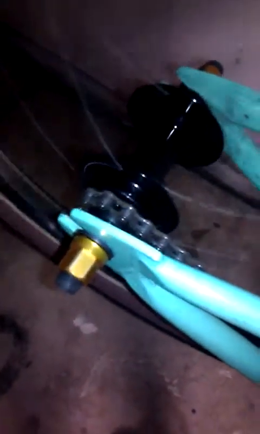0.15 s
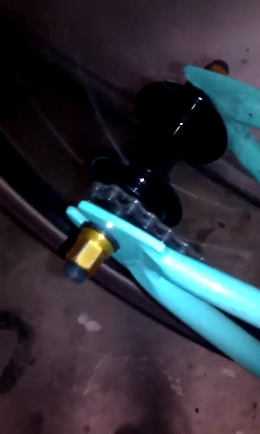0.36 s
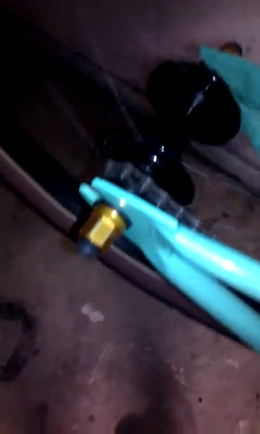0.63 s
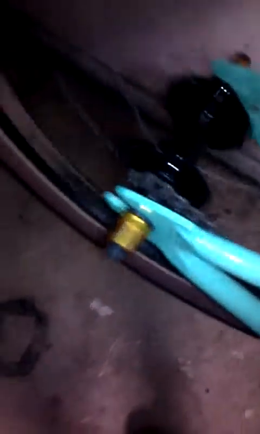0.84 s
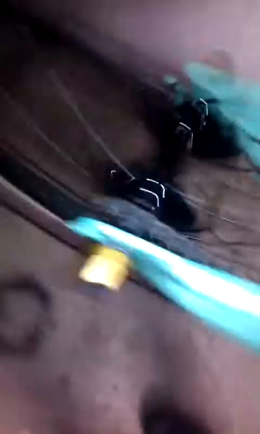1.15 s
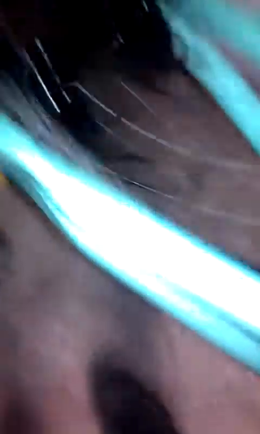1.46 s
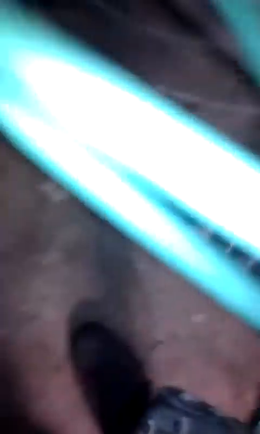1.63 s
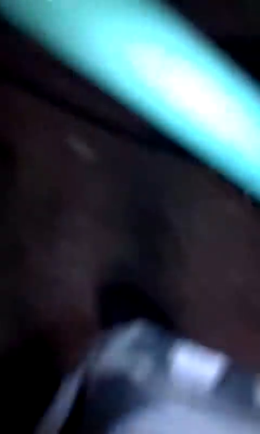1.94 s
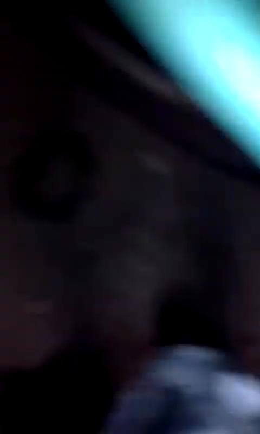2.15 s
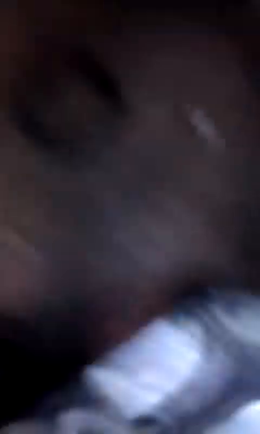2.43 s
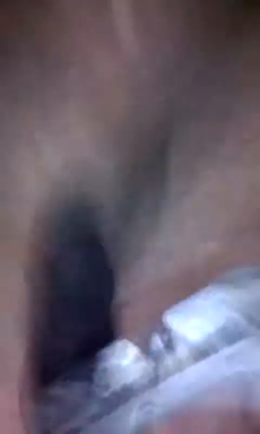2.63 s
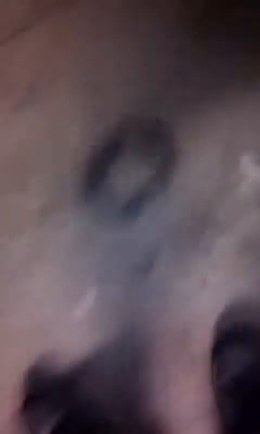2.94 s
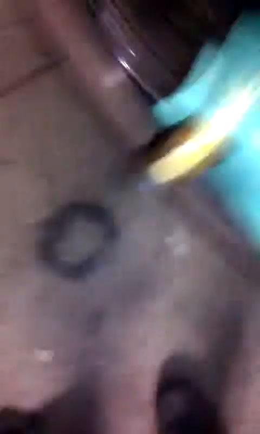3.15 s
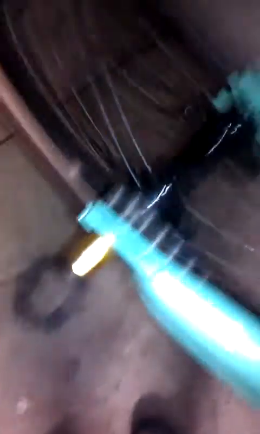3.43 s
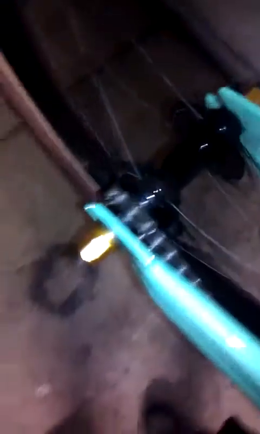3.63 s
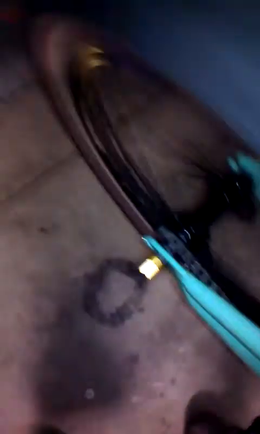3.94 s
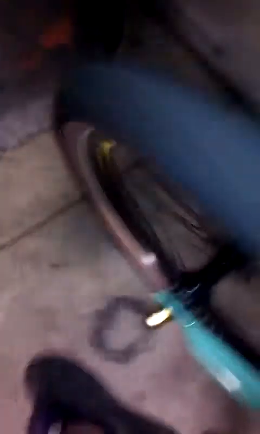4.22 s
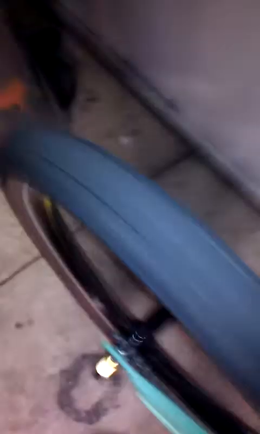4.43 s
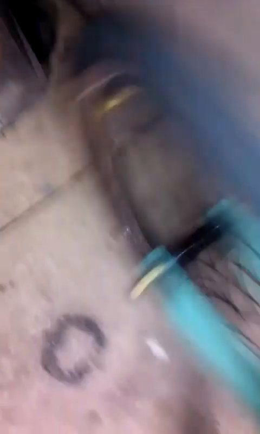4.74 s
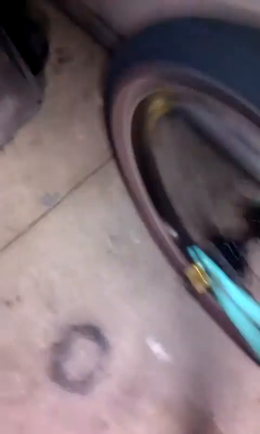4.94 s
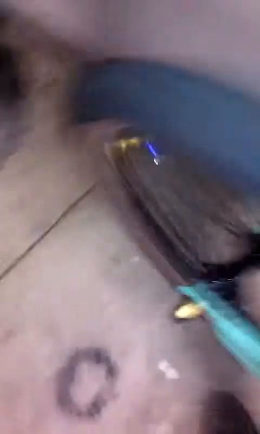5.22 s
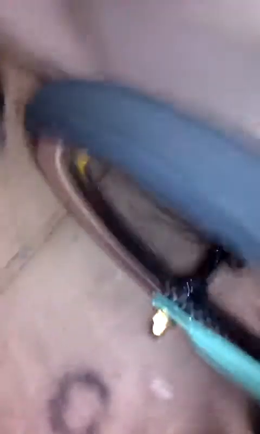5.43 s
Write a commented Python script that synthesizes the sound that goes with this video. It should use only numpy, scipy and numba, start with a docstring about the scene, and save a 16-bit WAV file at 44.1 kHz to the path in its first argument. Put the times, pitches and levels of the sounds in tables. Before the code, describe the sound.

A bicycle's rear hub freewheels close up, its metallic ratchet clicks blurring into a bright buzz that twice whirs faster, with a late thud.

```python
"""Freewheeling bicycle hub

A rear wheel spins freely close to a microphone in a concrete-floored room. Pawls snap over ratchet teeth
and ring damped modes of hub shell, spokes and frame; twice the cranks are pushed backwards and the clicks
speed up. Thuds, taps and scuffs ring frame modes; overload adds bursts of gated hiss and short one-sided
pops; low room noise is shaped noise with faint hums."""
import sys
import numpy as np
from scipy import signal
from scipy.fft import rfft, irfft, next_fast_len
from scipy.io import wavfile
from scipy.ndimage import uniform_filter1d
from numba import njit

SR = 44100
rng = np.random.default_rng(int(sys.argv[2]) if len(sys.argv) > 2 else 0)


def output_pcm(signal):
    """Save a mono or channel-first signal as 16-bit PCM at the path in sys.argv[1].

    Samples are clipped to [-1, 1] before scaling.
    """
    pcm = np.clip(np.atleast_2d(signal).T, -1, 1) * 32767
    wavfile.write(sys.argv[1], SR, np.round(pcm).astype(np.int16))


N = 246078

# pawls on each tooth: lag_teeth, scatter_teeth, near_strength_db, afar_strength_db
PAWLS = [(0.0, .008, -1.5, -7), (.12, 0.03, -9.5, -7.5), (.3, 0.04, -16, -10.5), (.5, 0.13, -16.5, -15)]
# span in which the microphone draws back: start_s, end_s
DRAWING_BACK_S = (3.65, 4.1)
# level swing of each frequency range with the wheel's turning, lowest range first: swing_db, lead_turns
TURN_SWING = [(0.57, 0.068), (1.2, 0.041), (3, -0.52), (1, -0.19), (.8, -0.49)]


def from_db(db):
    """Logarithmic level: decibels to amplitude gain."""
    return 10 ** (np.asarray(db) / 20)


def rms_one(x):
    """Normalisation of the mean power: scale to unit rms."""
    return x / np.sqrt(np.mean(x ** 2) + 1e-20)


def in_time(rows):
    """Linear interpolation in time: each column of a curve, one value a sample."""
    s, *columns = np.transpose(rows)
    return [np.interp(np.arange(N) / SR, s, column) for column in columns]


def at_hz(points, hz):
    """Spectral envelope, interpolated on a log-frequency axis."""
    point_hz, value = np.array(points)[:, 0], np.array(points)[:, 1]
    return np.interp(np.log(hz), np.log(point_hz), value)


def ring(clicks, hz, t60):
    """Damped oscillator: a unit click sets a sine of height 1 ringing, 60 dB down after t60 seconds."""
    r, w = from_db(-60 / (t60 * SR)), 2 * np.pi * hz / SR
    return signal.lfilter([0, np.sin(w)], [1, -2 * r * np.cos(w), r * r], clicks + 1e-18)


@njit
def ring_stepped(clicks, at, pull, r):
    """Damped oscillator with switched stiffness: its pitch takes a new value at each snap."""
    out, last, before = np.zeros(len(clicks)), 0.0, 0.0
    for k in range(len(at) - 1):
        for i in range(at[k], at[k + 1]):
            last, before = clicks[i] + pull[k] * last - r * r * before, last
            out[i] = last
    return out


def even(x):
    """Running power normalisation over 1/8 s, so that click speed does not set the loudness."""
    power = uniform_filter1d(x ** 2, size=SR // 8, mode="reflect")
    return x / np.sqrt(power + 1e-12)


def room(x, drift_per_s):
    """Diffuse reverberation of unit energy; the moving microphone glides between two echo patterns."""
    t60_s, onset_s = 0.7, 0.0016
    t = np.arange(SR // 2) / SR
    tails = rng.standard_normal((2, len(t))) * from_db(-60 * t / t60_s) * np.minimum(t / onset_s, 1)
    tails = tails / np.sqrt(np.sum(tails ** 2, axis=1, keepdims=True))
    size = next_fast_len(N + SR)
    here, there = irfft(rfft(x, size) * rfft(tails, size), size)[:, :N]
    angle = 2 * np.pi * drift_per_s * np.arange(N) / SR
    return here * np.cos(angle) + there * np.sin(angle)


def teeth_passed():
    """Ratchet kinematics: tooth rate integrated to the count of teeth gone by the pawls."""
    # ratchet speed: time_s, teeth_per_s
    spin = [(0.0, 69.39), (1.0, 67.42), (1.8, 64.63), (2.083, 66.05), (2.277, 86.41), (2.489, 121.8),
            (2.699, 87.71), (2.959, 57.6), (3.15, 55.7), (3.3, 57.73), (3.6, 56.1), (3.9, 57.04),
            (4.08, 59.84), (4.216, 56.82), (4.465, 76.97), (4.673, 158.52), (4.749, 127.3), (4.808, 50.0),
            (5.0, 57.02), (5.3, 54.9), (5.58, 55.51)]
    teeth_before_first_snap = .695
    return np.cumsum(in_time(spin)[0]) / SR - teeth_before_first_snap


def afar_at(s):
    """Source distance as a fraction: 0 while the microphone is near, 1 once it has drawn back."""
    return np.interp(s, DRAWING_BACK_S, [0, 1])


def turn_db(swing_db, lead_turns):
    """Rotational modulation: level swings once a wheel turn, fading as the microphone draws back."""
    start_turns_per_s, slowing_per_s = 3.04, .24  # turns per s, and its loss each second
    t = np.arange(N) / SR
    turns = start_turns_per_s * t - slowing_per_s * t ** 2 / 2
    return (1 - afar_at(t)) * swing_db * np.cos(2 * np.pi * (turns + lead_turns))


def snaps(uneven_db):
    """Impact excitation: sample and strength of each snap; pawls of one tooth land a little apart."""
    teeth = teeth_passed()
    tooth = np.arange(int(teeth[-1]))[:, None]
    lag, scatter, near_db, afar_db = np.transpose(PAWLS)
    chance = rng.standard_normal((len(tooth), 2, len(PAWLS)))
    at = np.interp(tooth + lag + scatter * chance[:, 0], teeth, np.arange(N))
    afar = afar_at(at / SR)
    strength = from_db(near_db + afar * (afar_db - near_db) + uneven_db * chance[:, 1])
    return at.astype(int).ravel(), strength.ravel()


def shell_modes(count):
    """Modal density: closely packed modes follow a spectrum, and shorter rings get taller."""
    # spectrum of hub and spoke modes: pitch_hz, density_db_per_hz
    shell = [(560, -77.5), (950, -22.5), (1170, -24.5), (1930, -18.5), (2480, -10.5), (2670, -18.5),
             (2920, 8), (3300, -5.5), (4310, 0), (4680, -15), (5630, -24), (6060, -16), (7700, 2),
             (8060, -8.5), (8600, -10), (11200, -45.5), (18900, -120)]
    # decay of these modes: pitch_hz, t60_s
    shell_t60 = [(800, 0.04), (3000, 0.043), (5500, 0.042), (8500, 0.043)]
    hz = np.linspace(900, 8800, count) + rng.uniform(-26.5, 7.6, count)
    t60 = at_hz(shell_t60, hz)
    return np.transpose([hz, at_hz(shell, hz) - 10 * np.log10(t60 / 0.017), t60])


def struck(at, strength, modes, fickle_db, detune, swell=False):
    """Modal synthesis in five ranges: each snap shares its energy anew and shifts the pitches a little."""
    # edges between the five ranges: edge_hz
    range_edges_hz = (2800, 3800, 4500, 5600)
    # span in which the microphone turns to the rim: start_s, end_s
    turning_s = (2.7, 3.45)
    # towards the rim other modes face the microphone: pitch_hz, change_db
    rim_colour = [(1000, 0), (1550, -2.5), (2000, -1), (2550, 1.5), (3000, 4.5), (3600, 7), (4300, -16.5),
                  (5200, -18), (6150, -2), (7000, -4), (7800, -1), (8600, 4.5)]
    out = np.zeros((len(TURN_SWING), N))
    steps = np.append(np.sort(at), N)
    chance = rng.standard_normal((len(at), 3, len(modes)))
    height = from_db(np.array(modes)[:, 1])
    share = height * from_db(fickle_db * chance[:, 1])
    # the shares of every snap hold the same total energy
    share = share * np.sqrt(np.sum(height ** 2) / np.sum(share ** 2, axis=1, keepdims=True))
    turned = np.interp(at / SR, turning_s, [0, 1])
    for k, (hz, _, t60) in enumerate(modes):
        r, w = float(from_db(-60 / (t60 * SR))), 2 * np.pi * hz / SR
        pull = 2 * r * np.cos(w * (1 + detune * chance[:, 2, k]))
        sign = np.sign(chance[:, 0, k])
        colour = from_db(turned * at_hz(rim_colour, hz))
        clicks = np.full(N, 1e-18)
        clicks[at] = np.sin(w) * strength * sign * share[:, k] * colour
        tone = ring_stepped(clicks, steps, pull, r)
        if swell:  # the blow reaches the radiating part through a like resonance: the ring swells first
            tone = ring_stepped(tone, steps, pull, r) * np.sin(w) * 20 / (t60 * SR)
        out[np.searchsorted(range_edges_hz, hz)] += tone
    return out


def freehub():
    """Impact-driven modal radiation: snaps ring shell and frame, heard direct and by the room."""
    # hub level before the turn swing: time_s, level_db at 2.8-3.8 kHz, then against it:
    # low_db (below 2.8 kHz), upper_db (3.8-4.5 kHz), valley_db (4.5-5.6 kHz), treble_db (above)
    hub_level = [(0.0, -26.5, -11, -2, -8, 0), (0.25, -25, -11, -6.5, -9.5, -0.5),
                 (0.5, -26, -11.5, -6, -10, -0.5), (0.9, -26.5, -10.5, -6, -8.5, 0),
                 (1.3, -25, -10.5, -7, -9, 1), (1.8, -23.5, -12.5, -7, -7, -0.5),
                 (2.15, -22.5, -12, -6.5, -9.5, -1), (2.4, -23.5, -10, -5, -6.5, 1),
                 (2.62, -22, -12.5, 2, -13, -5.5), (2.75, -22, -11, -11, -7.5, -3.5),
                 (3.0, -25, -10, -5, -9, -4), (3.25, -23, -13.5, -16, -14.5, -9),
                 (3.4, -31, -3.5, -5.5, -7, 1.5), (3.55, -25.5, -10, -15, -14, -4.5),
                 (3.7, -27, -5, -9, -10.5, -6.5), (3.9, -33.5, -4.5, -6.5, -6, -1),
                 (4.05, -30, -6, -10, -10.5, -3), (4.3, -32.5, -4, -4.5, -7.5, -2.5),
                 (4.55, -27, -8, -6, -10, -2), (4.7, -21, -8, -8, -12, -5),
                 (4.77, -27, -6, -3, -10.5, -4.5), (4.85, -31, -4, -10, -9.5, -2),
                 (5.2, -31.5, -6.5, -5.5, -8.5, -3.5), (5.58, -32.5, -6.5, -10, -6.5, -2)]
    # room against direct sound, before each range's own offset: time_s, room_db
    room_share = [(0, -7), (1.5, -9.5), (1.8, -8.5), (2.1, -8.5), (2.5, -6.5), (3.1, -11.5), (4.2, -8),
                  (5.58, -9.5)]
    # sparse frame modes, relative: pitch_hz, level_db, t60_s
    frame = [(959, -36, 0.042), (1566, -38, 0.07), (1800, -33, 0.036), (2497, -22.5, 0.032),
             (3016, -24, 0.038), (3270, -16, .025), (3980, -12.5, .03), (6200, -14, 0.028),
             (6540, -15, 0.046), (7370, -29, 0.02)]
    # swelling rings at each snap, short and long, relative: pitch_hz, level_db, t60_s of each resonance
    crack = [(1620, -30, 0.0033), (3031, -7, 0.055), (3330, -10, 0.0045), (3750, -1, 0.016),
             (4226, -10, 0.033), (5150, -18.5, 0.005), (6030, -20, 0.035), (6940, -1, 0.0065),
             (7756, -3.5, 0.0078), (8000, -9.5, 0.0081)]
    # the first pawl's own sharp tick, same columns: pitch_hz, level_db, t60_s
    tick = [(3020, -9, .009), (3330, -2, .012), (3720, -5, .007), (4200, -8, .006), (6150, -12, .007),
            (7600, -6, .004)]
    level_db, low_db, upper_db, valley_db, treble_db = in_time(hub_level)
    room_db = in_time(room_share)[0]
    at, strength = snaps(uneven_db=1.0)
    parts = struck(at, strength, shell_modes(count=105), fickle_db=7.5, detune=0.01)
    parts = parts + from_db(12.5) * struck(at, strength, frame, fickle_db=2.0, detune=0.0048)
    parts = parts + from_db(14.5) * struck(at, strength, crack, fickle_db=6.0, detune=0.026, swell=True)
    first = slice(None, None, len(PAWLS))
    ticks = struck(at[first], strength[first], tick, fickle_db=2.5, detune=.022, swell=True)
    parts = parts + from_db(23) * ticks
    range_db = (low_db, 0, upper_db, valley_db, treble_db)
    more_room_db = (9.5, 2.5, 8.5, 9, 4.3)
    lowest_hz = (960, 2600, 3260, 4040, 5300)
    out = 0
    for part, db, wetter_db, bottom_hz, turn in zip(parts, range_db, more_room_db, lowest_hz, TURN_SWING):
        # small parts radiate little below their own modes
        highpass = signal.butter(3, bottom_hz, "high", fs=SR, output="sos")
        direct = even(signal.sosfilt(highpass, part))
        wet = from_db(room_db + wetter_db) * room(direct, drift_per_s=1.3)
        out = out + from_db(level_db + db + turn_db(*turn)) * even(direct + wet)
    return out, at


def rumble():
    """Spectral shaping of noise: low room noise with faint resonant hums, uneven in level."""
    # noise spectrum, relative: pitch_hz, density_db_per_hz
    spectrum = [(100, 5), (130, -7), (190, -15.5), (240, 5.5), (285, -6), (340, -24), (395, -6.5),
                (470, 6.5), (555, -10.5), (640, -0.5), (720, -10.5), (800, -29), (870, -12), (950, 1.5),
                (1200, -6.5)]
    # noise level: time_s, level_db
    noise_level = [(0, -44.5), (1.5, -49), (2.45, -45.5), (2.9, -51), (3.8, -42.5), (4.3, -47.5),
                   (4.7, -41), (4.95, -44.5), (5.58, -45)]
    # hums against the noise: pitch_hz, level_db, t60_s
    hums = [(282.5, -16, 0.2), (335.6, -17, 0.13), (391, -20.5, .14), (556, -14.5, 0.033)]
    flicker_db = 2  # rms; the noise comes and goes some ten times a second
    hz = np.maximum(np.arange(N // 2 + 1) * SR / N, 1)
    noise = rms_one(irfft(rfft(rng.standard_normal(N)) * from_db(at_hz(spectrum, hz)), N))
    for pitch, db, t60 in hums:
        noise = noise + from_db(db) * rms_one(ring(rng.standard_normal(N), pitch, t60))
    smooth = uniform_filter1d(rng.standard_normal(N), size=SR // 25)
    flicker = rms_one(uniform_filter1d(smooth, size=SR // 25))
    return from_db(in_time(noise_level)[0]) * rms_one(noise * from_db(flicker_db * flicker))


def blow(s, db, hz, t60):
    """Cascaded resonance: under soft blows a close pair of modes swells and dies."""
    click = np.zeros(N)
    click[np.round(np.asarray(s) * SR).astype(int)] = from_db(db) * 10 / (t60 * SR)
    return sum(ring(ring(click, pitch, t60), pitch, t60) for pitch in (hz, hz * 1.15))


def knocks():
    """Modal response to impact: thuds ring the frame's low modes, taps a pitch and its overtone."""
    # light taps on the frame: start_s, level_db, pitch_hz, t60_s, overtone_db
    taps = [(.865, -32.5, 623, 0.036, -11), (1.0625, -8, 2000, 0.0042, 0), (5.1306, -20, 674, 0.0048, -10),
            (5.142, -32, 603, 0.048, -7)]
    # dull thuds of the frame on the floor: start_s, level_db
    thuds = [(4.43, -39.5), (4.622, -33.5), (4.7326, -17), (4.752, -22), (4.776, -27.5), (4.80, -33),
             (4.844, -34)]
    # modes of each thud, against its level: pitch_hz, level_db, t60_s
    thud_modes = [(350, 5.5, 0.031), (530, 3, 0.019), (1150, -1, .01), (1820, -37, .008)]
    overtone_ratio, room_db = 2.1, -16
    thud_s, thud_db = np.transpose(thuds)
    out = sum(blow(thud_s, thud_db + mode_db, hz, t60) for hz, mode_db, t60 in thud_modes)
    for s, db, hz, t60, overtone_db in taps:
        out = out + blow(s, db, hz, t60)
        out = out + blow(s, db + overtone_db, hz * overtone_ratio, t60 / 2)
    return out + from_db(room_db) * room(out, drift_per_s=0.301)


def overload_hiss(at):
    """Amplitude-modulated noise: brief overload bursts above 9.7 kHz, pulsing with the clicks."""
    # bursts of noise: start_s, end_s, level_db
    bursts = [(1.717, 1.845, -47), (2.02, 2.057, -48), (2.272, 2.778, -51.5), (2.373, 2.5, -45)]
    pulse_t60_s, edge_s, steady_share = .025, 0.0088, 0.27
    clicks = np.zeros(N)
    clicks[at[::len(PAWLS)]] = 1
    fade = from_db(-60 / (pulse_t60_s * SR))
    pulses = (signal.lfilter([1], [1, -fade], clicks) + steady_share) * rng.standard_normal(N)
    hiss = signal.sosfilt(signal.butter(6, [9700, 17500], "band", fs=SR, output="sos"), pulses)
    t = np.arange(N) / SR
    gate = np.zeros(N)
    for start, end, db in bursts:
        inside_s = np.minimum(t - start, end - t)
        gate += from_db(db) * np.clip(inside_s / edge_s + .5, 0, 1) ** 2
    return gate * even(hiss)


def overload_pops():
    """Broadband transients: overload gives one-sided Gaussian clicks."""
    # short broadband pops: centre_s, peak_db, direction (+1 or -1)
    gaussians = [(1.747, -28.5, 1), (1.7924, -28, 1), (1.8243, -30, 1), (2.039, -53, 1), (2.3754, -39, 1),
                 (2.3858, -31, 1), (2.406, -33, -1), (2.423, -26.5, -1), (2.4318, -26, 1), (2.441, -25, 1),
                 (2.4484, -31, -1), (2.476, -35, -1), (2.491, -29, 1), (2.5084, -42, 1)]
    width_s = 0.00017  # from the centre to 1/e of the peak
    t = np.arange(N) / SR
    return sum(np.sign(way) * from_db(db) * np.exp(-((t - s) / width_s) ** 2) for s, db, way in gaussians)


def scuffs():
    """Stochastic contact excitation: dense small contacts along the floor ring the frame's low modes."""
    # scuffs of the frame: start_s, end_s, first_db, last_db
    spans = [(4.623, 4.729, -49.5, -39), (5.128, 5.314, -44, -53)]
    # modes they ring, relative: pitch_hz, level_db, t60_s
    scuff_modes = [(303, 2.5, 0.041), (403, -1, 0.032), (527, -9, 0.028), (720, 4.5, 0.026),
                   (930, -3, 0.053), (1250, 0, 0.016)]
    grains_per_s = 300  # for each mode
    t = np.arange(N) / SR
    rub = np.zeros(N)
    for hz, db, t60 in scuff_modes:
        grains = (rng.random(N) < grains_per_s / SR) * rng.standard_normal(N)
        rub += from_db(db) * ring(grains, hz, t60)
    press = np.zeros(N)
    for start, end, first_db, last_db in spans:
        press += (t > start) * (t < end) * from_db(np.interp(t, [start, end], [first_db, last_db]))
    return uniform_filter1d(press, size=SR // 100) * rms_one(rub)


def voice_path(x):
    """Saturation and band limiting: the microphone flattens loud peaks and keeps the voice band."""
    ceiling, stopband_hz = .45, 9383  # amplitude; 60 dB down from this frequency up
    x = x / (1 + np.abs(x / ceiling) ** 4) ** (1 / 4)
    x = signal.sosfilt(signal.butter(8, 165, "high", fs=SR, output="sos"), x)
    return signal.sosfilt(signal.cheby2(14, 60, stopband_hz, fs=SR, output="sos"), x)


def scene():
    """Superposition: all sources add at one microphone; overload hiss and pops bypass the voice path."""
    hub, at = freehub()
    voiced = voice_path(hub + rumble() + knocks() + scuffs())
    return (voiced + overload_hiss(at) + overload_pops())[None]


def record(dry):
    """Low-pass filtering: the top is cut, 60 dB down from 16 kHz up."""
    return signal.sosfilt(signal.cheby2(20, 60, 16000, fs=SR, output="sos"), dry)


dry = scene()
out = record(dry)
output_pcm(out)
```